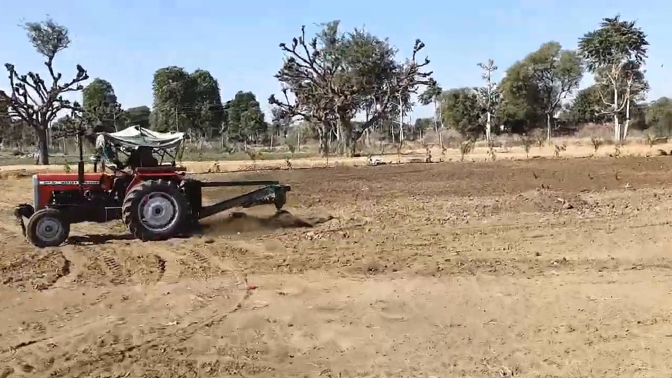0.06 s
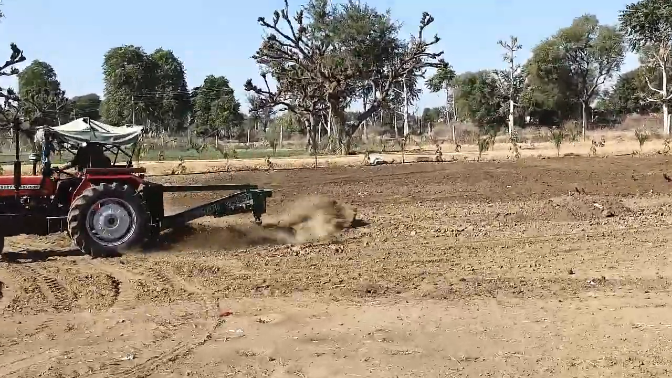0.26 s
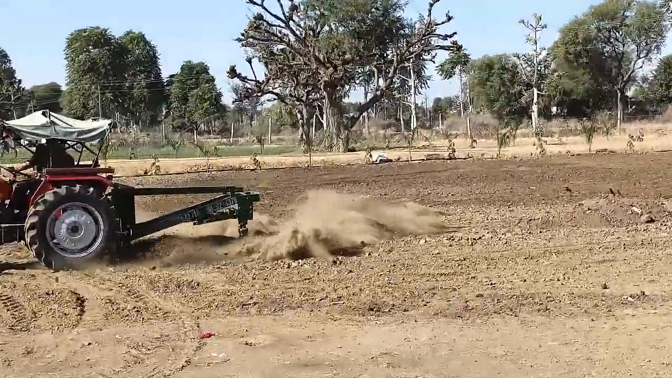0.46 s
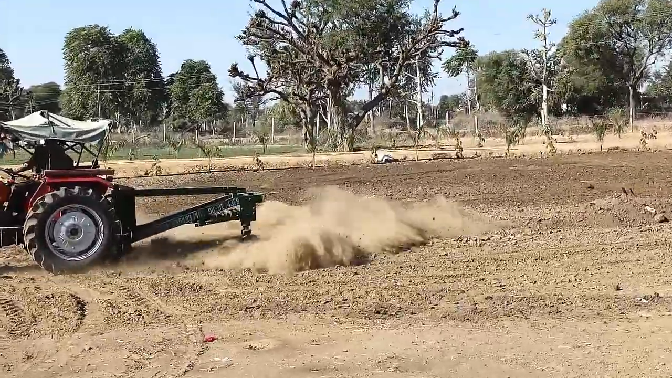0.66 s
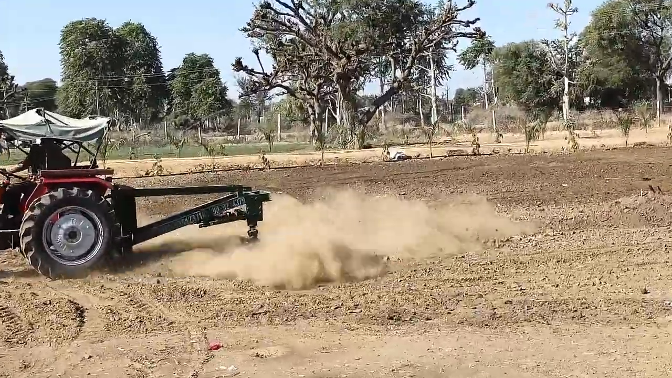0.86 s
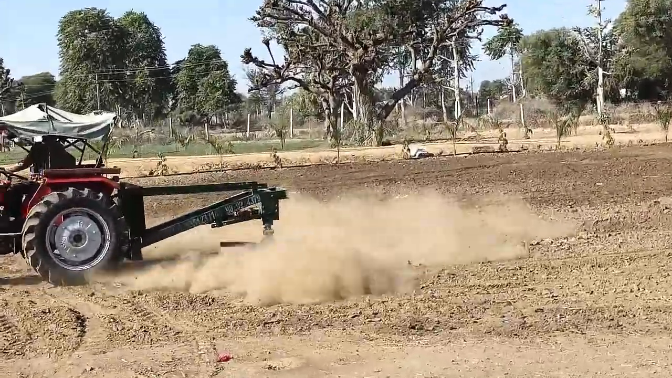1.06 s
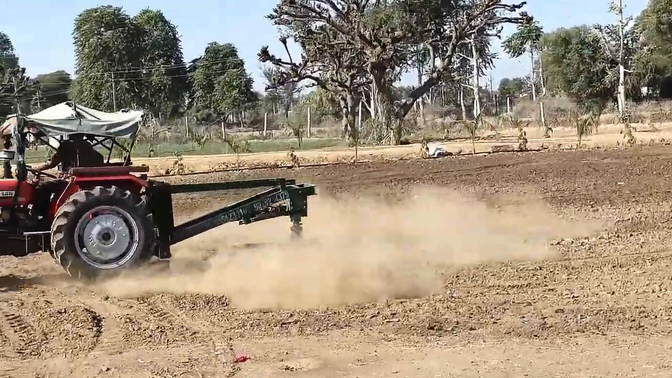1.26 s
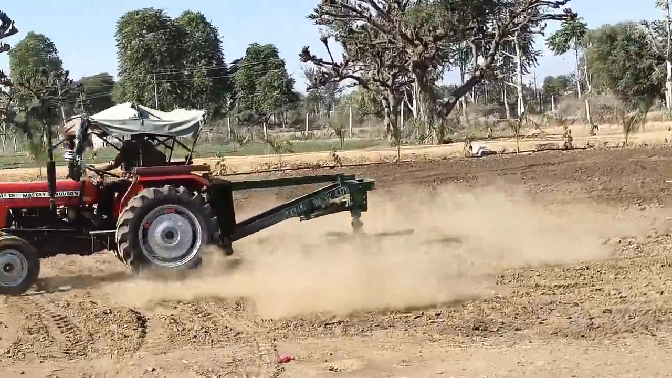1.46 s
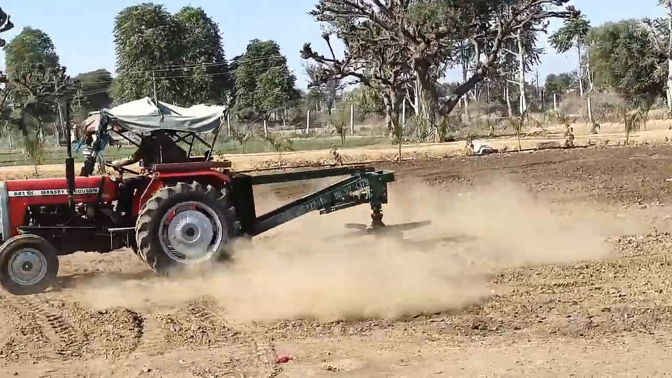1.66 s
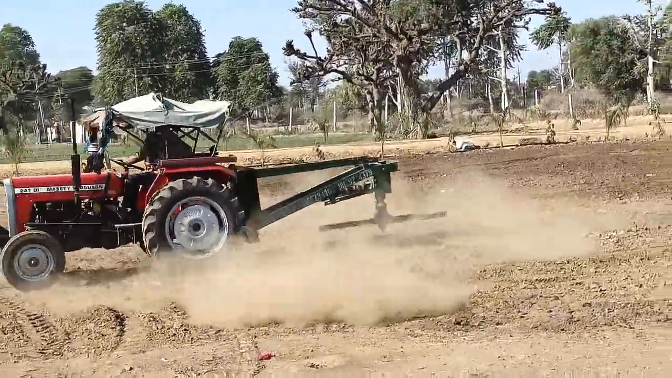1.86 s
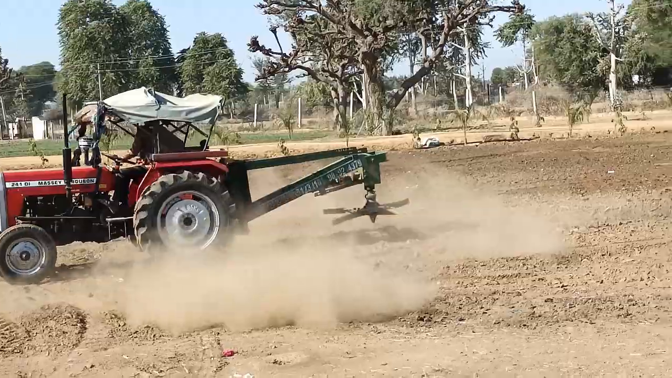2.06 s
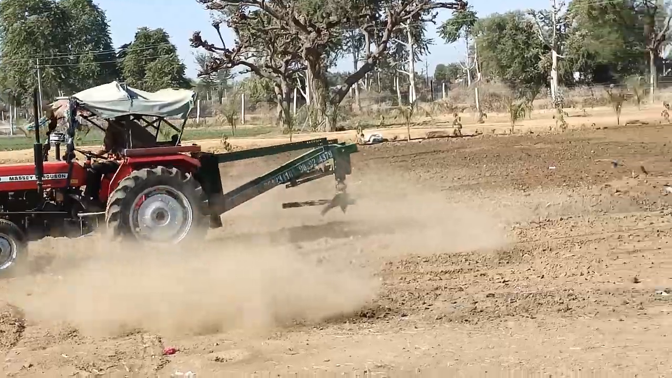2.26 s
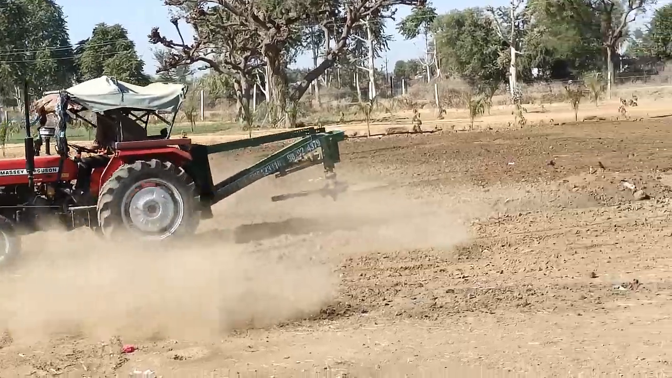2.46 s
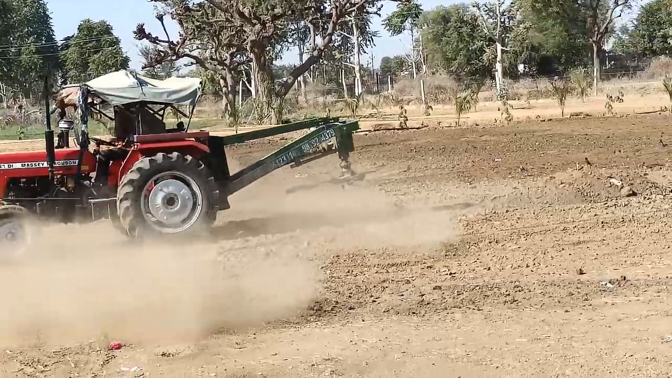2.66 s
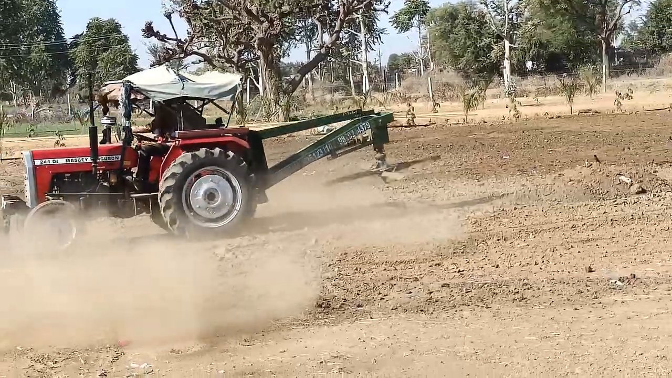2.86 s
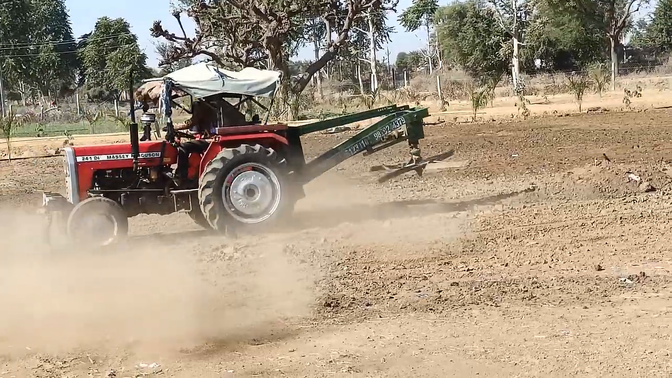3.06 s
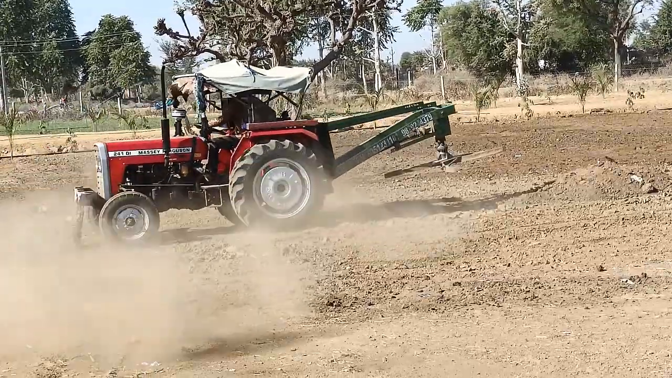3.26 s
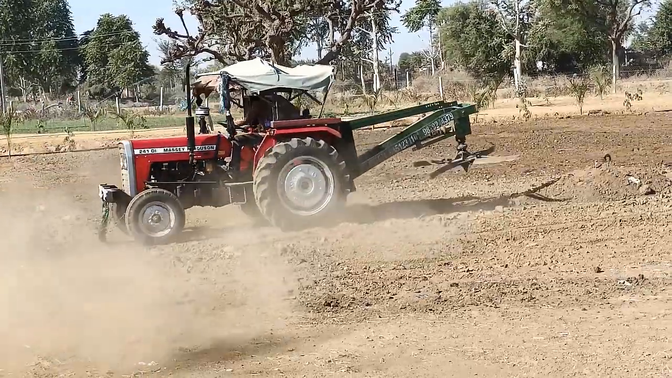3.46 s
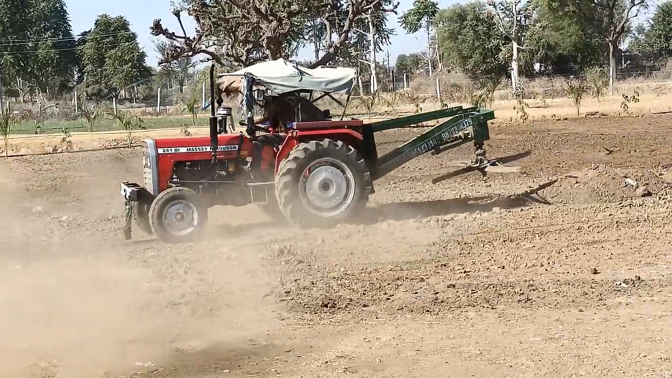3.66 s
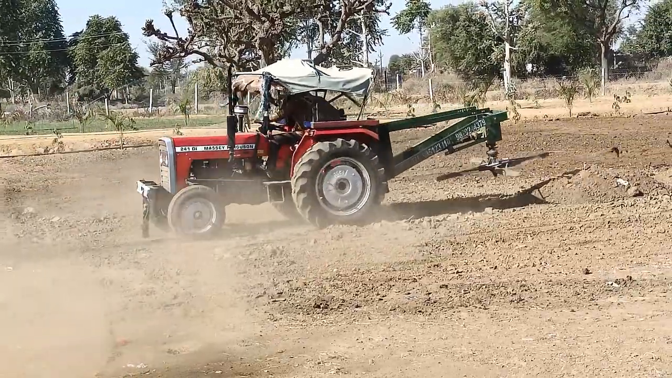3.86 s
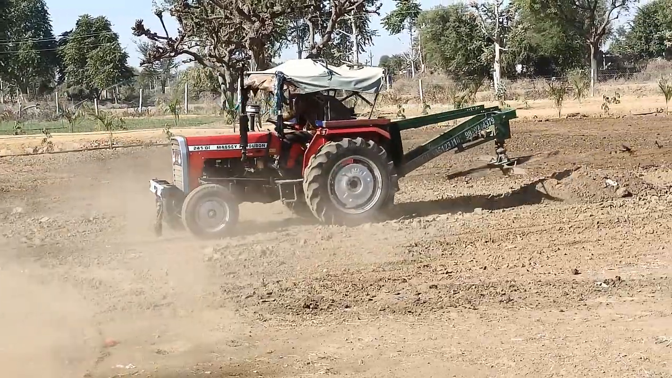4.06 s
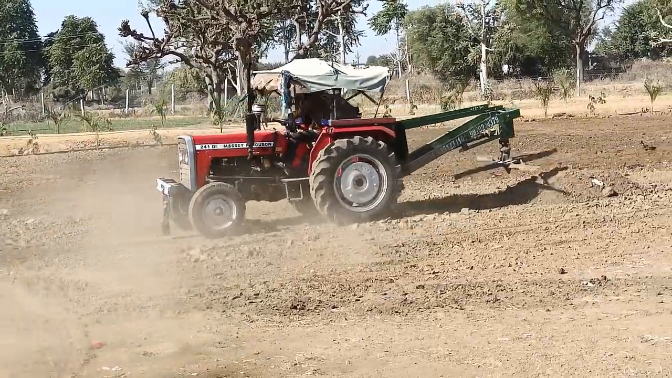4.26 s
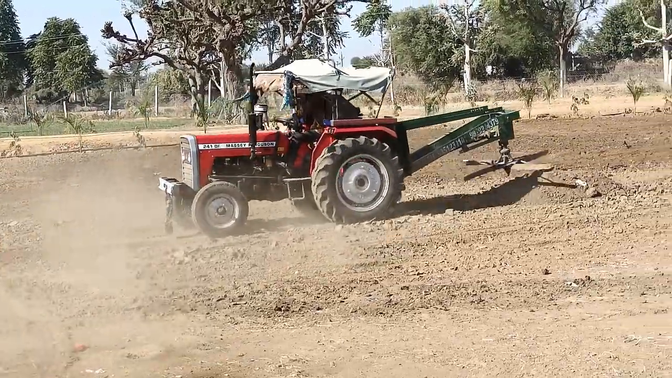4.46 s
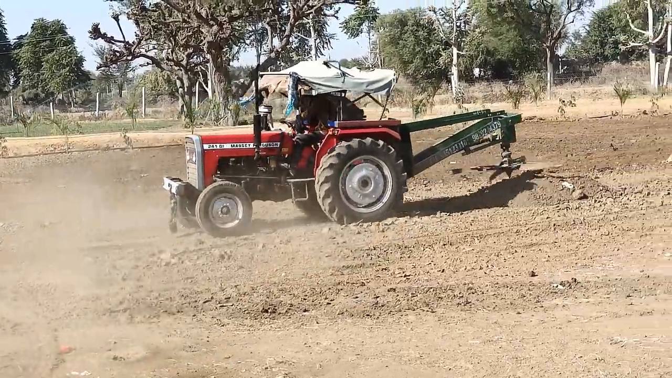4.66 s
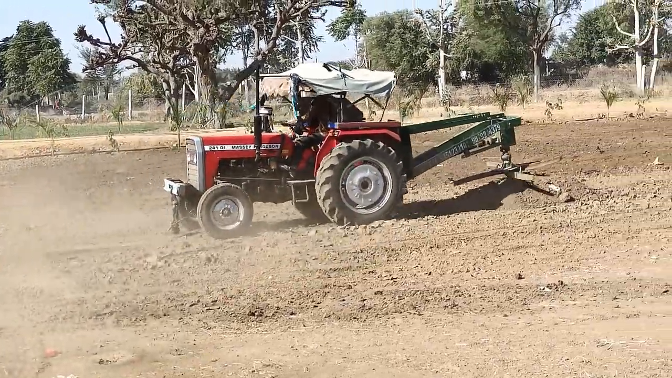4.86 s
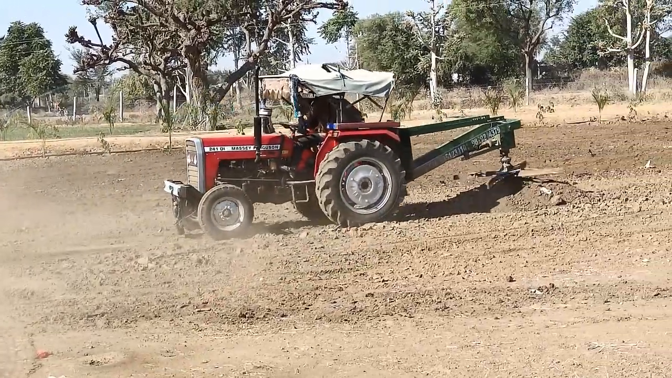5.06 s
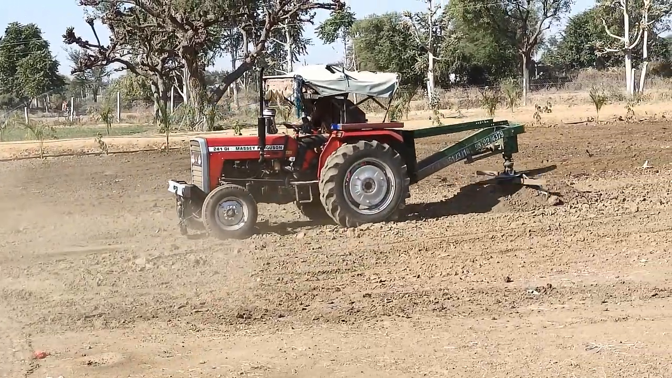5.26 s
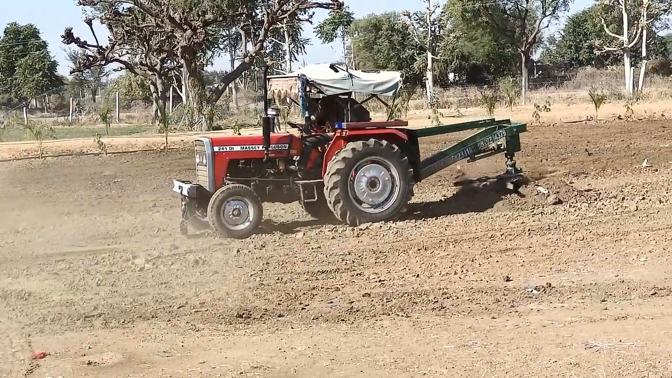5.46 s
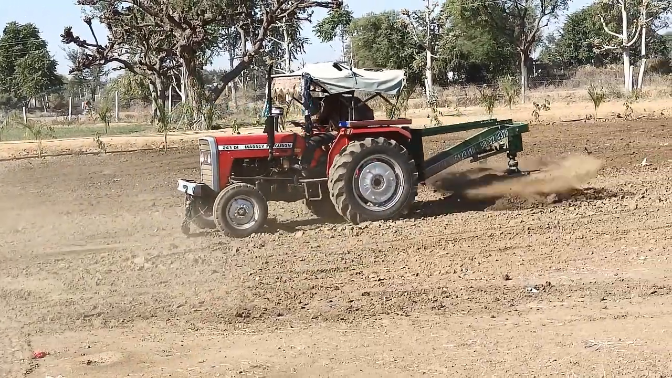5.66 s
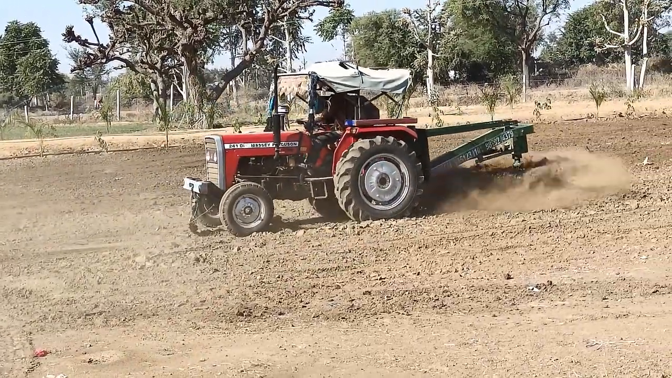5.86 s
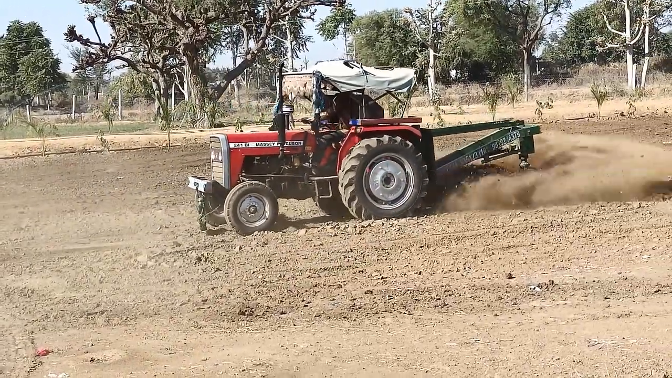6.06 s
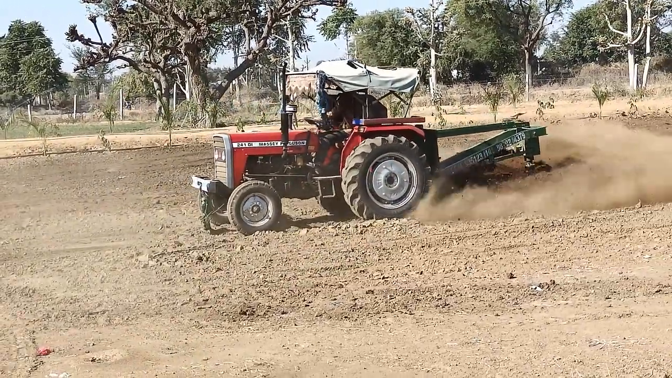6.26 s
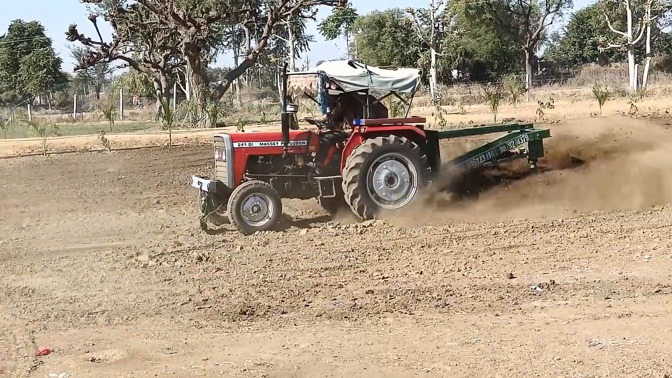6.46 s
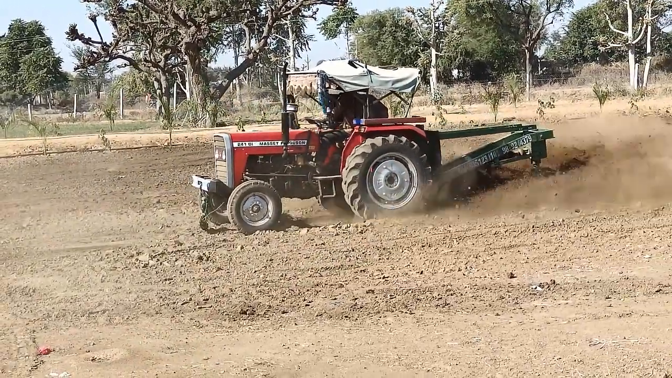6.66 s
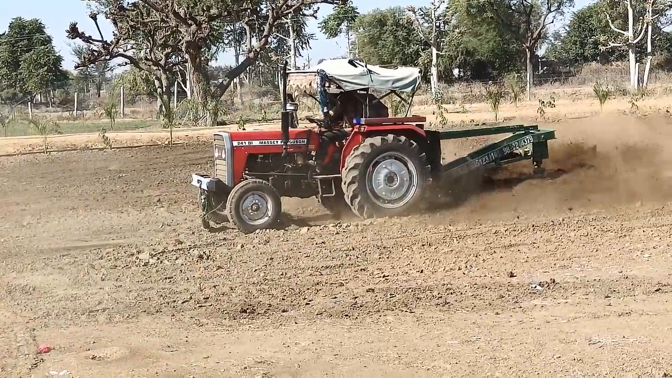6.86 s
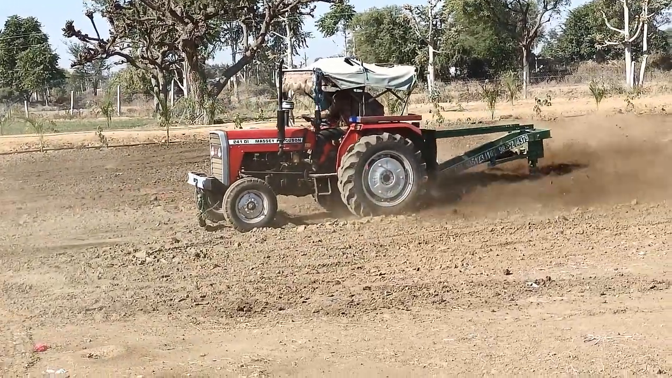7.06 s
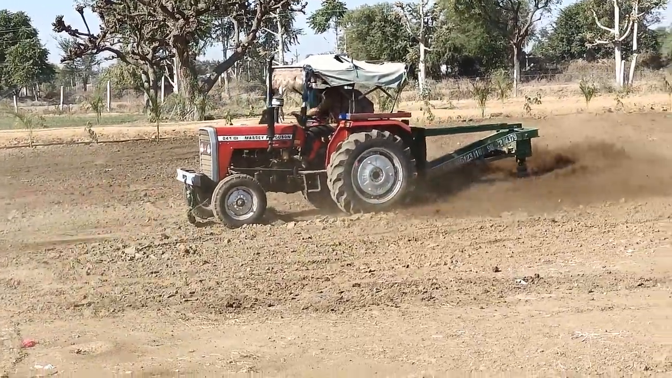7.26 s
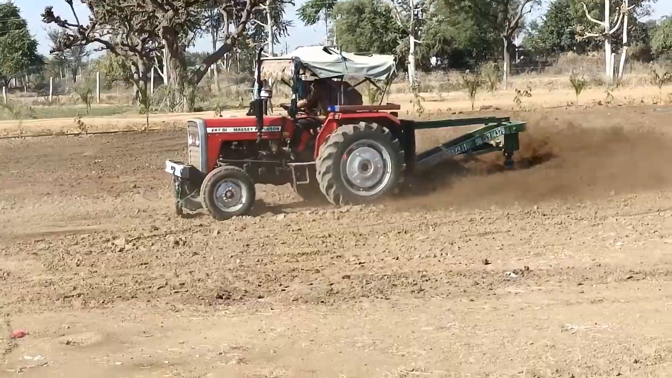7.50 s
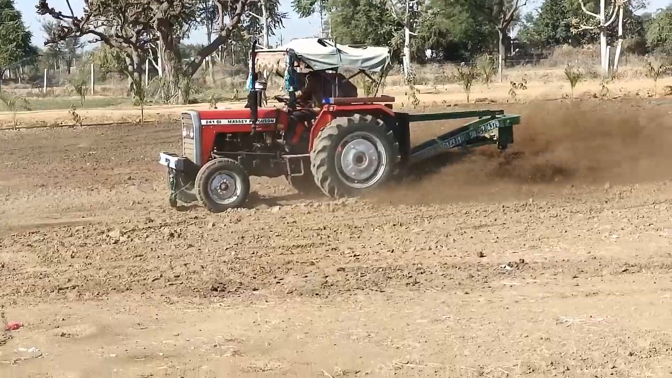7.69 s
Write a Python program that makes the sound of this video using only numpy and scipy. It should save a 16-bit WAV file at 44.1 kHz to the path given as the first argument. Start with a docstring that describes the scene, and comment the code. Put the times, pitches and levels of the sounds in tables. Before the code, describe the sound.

A tractor diesel thumps under load, revs up fast with early gritty scraping and metal clanks, coasts down to rattling clatter, then labours hard again.

```python
"""A tractor revs up, coasts down, then labours again; scraping is loud early, then fades.
Timed pressure swings make the exhaust thump; pulsed noise adds bark, growl, roar and hiss.
Knock noise rings the engine block and loose panels; grainy noise scrapes and sings in the steel blade.
Struck resonances clank, sines squeak, drone and whine, narrow noise hums, and low noise gusts as wind."""
import sys
import numpy as np
from scipy import signal
from scipy.fft import rfft, irfft, next_fast_len
from scipy.io import wavfile
from scipy.ndimage import uniform_filter1d

SR = 44100
rng = np.random.default_rng(int(sys.argv[2]) if len(sys.argv) > 2 else 0)


def int16_out(signal):
    """Quantize to a 16-bit WAV file."""
    q = np.round(np.clip(np.atleast_2d(signal).T, -1, 1) * 32767)
    wavfile.write(sys.argv[1], SR, q.astype(np.int16))


N = 340893
TIME = np.arange(N) / SR
CRUISE_PER_S = 25  # firing rate at which the level laws and swing pitch are quoted

# engine speed: t/s, firing rate/Hz
FIRING_RATE = [(0, 16.4), (.5, 16.5), (.64, 17.9), (.75, 20.9), (.88, 22), (1.02, 21.2), (1.14, 19.9),
               (1.3, 21.9), (1.49, 22.56), (1.88, 30.55), (2.32, 37.07), (2.6, 38.2), (3.74, 28.61),
               (5.3, 18.38), (5.64, 22.82), (5.78, 27.19), (6.21, 28.98), (6.46, 25.93), (6.8, 26.43),
               (7.24, 32.19), (7.73, 33.06)]
# spectrum of gas hiss: f/Hz, relative density/dB
JET_SPECTRUM = [(1500, -35), (3500, 0), (4300, 7), (5200, -11), (6400, 11), (7400, 21), (8100, 13.5),
                (8800, 3.5), (12000, 6.5), (16000, 6.5)]


def from_db(db):
    """Decibels to amplitude gain."""
    return 10 ** (np.asarray(db) / 20)


def rms_one(x):
    """Scale to rms 1 over all channels."""
    return x / np.sqrt(np.mean(x ** 2) + 1e-20)


def in_time(rows):
    """Columns of a time table, interpolated at every sample."""
    s, *columns = np.transpose(rows)
    return [np.interp(TIME, s, c) for c in columns]


def at_hz(points, hz):
    """Interpolate a spectrum on a log-frequency axis."""
    f, value = np.transpose(points)
    return np.interp(np.log(hz + 1), np.log(f), value)


def panned(pan_db):
    """Left and right gains of constant power for a left-right difference in dB."""
    gains = from_db(np.array([[.5], [-.5]]) * pan_db)
    return gains / np.sqrt(np.mean(gains ** 2, axis=0))


def drift(rate_hz):
    """Random curve through unit-spread knots at the given rate."""
    knots = rng.standard_normal(24000)
    return np.interp(TIME * rate_hz, np.arange(len(knots)), knots)


def pair(mid, side, alike):
    """Mix two unrelated signals to a left and right of given likeness."""
    alike = np.clip(alike, -1, 1)
    return np.sqrt(1 + alike) * mid + np.sqrt(1 - alike) * side * [[1], [-1]]


def coloured(spectrum, grain=1):
    """Shaped noise, smooth or grainy, with the likeness, lag and balance of two ports; rms 1."""
    # microphone ports: f/Hz, likeness/0-1, phase lag of the left/rad
    ports = [(60, 0.76, 0.77), (300, 1, 0.16), (463, 0, 0.46), (806, 1, 0.11), (1270, 0.25, 2.09),
             (1434, 0.94, 2.96), (1536, 0.15, 5.6), (1960, 0.95, 7.26), (2440, 0.34, 9.2),
             (3000, 0.57, 11.3), (3514, 0.68, 14.57), (4640, 0, 19.2), (7580, 0.28, 36.3), (16360, 0, 68)]
    # colour difference of the ports: f/Hz, left-right/dB
    balance = [(300, 1.5), (450, 2), (580, -15), (800, -2), (1100, 3.5), (1600, -10.5), (1950, 3.5),
               (2350, 32), (2950, -13), (3600, -3.5), (4400, -7), (5200, 0.5), (7400, -13.5), (8800, 1),
               (11000, 5.5), (16000, 3.5)]
    size = next_fast_len(N)
    hz = np.arange(size // 2 + 1) * SR / size
    port_hz, alike, lag_rad = np.transpose(ports)
    mid, side = rfft(rng.standard_normal((2, N)) * grain, size)
    stereo = pair(mid, side, np.interp(hz, port_hz, alike))
    turned = np.exp(np.array([[-.5j], [.5j]]) * np.interp(hz, port_hz, lag_rad))
    shaped = stereo * turned * panned(at_hz(balance, hz)) * from_db(at_hz(spectrum, hz))
    return rms_one(irfft(shaped, size)[:, :N])


def resonate(x, hz, width_hz):
    """Two-pole resonance with gain near 1 at its peak."""
    r = np.exp(-np.pi * width_hz / SR)
    zeros = np.array([1, 0, -1]) * (1 - r * r) / 2
    poles = [1, -2 * r * np.cos(2 * np.pi * hz / SR), r * r]
    return signal.lfilter(zeros, poles, x + 1e-18)


def rung(x, modes):
    """Parallel resonances of alternating sign, weighted by relative rms; total rms 1."""
    total = 0
    for k, (hz, width_hz, db) in enumerate(modes):
        total = total + (-1) ** k * from_db(db) * rms_one(resonate(x, hz, width_hz))
    return rms_one(total)


def burst(age_s, rise_s, decay_s):
    """Gaussian rise up to age 0, exponential decay after it."""
    return np.exp(-np.where(age_s < 0, (age_s / rise_s) ** 2, age_s / decay_s))


def bursts(times, gains, rise, decay):
    """Sum of one burst at each time; rise and decay in s."""
    out = np.zeros(N)
    for s, gain in zip(times, gains):
        near = slice(max(int((s - 3 * rise) * SR), 0), max(int((s + 8 * decay) * SR), 0))
        out[near] += gain * burst(TIME[near] - s, rise, decay)
    return out


def throb(times, rise, decay, uneven_db):
    """One burst per firing event, of random strength."""
    return bursts(times, from_db(uneven_db * rng.standard_normal(len(times))), rise, decay)


def levelled(x):
    """Hold the power near 1 over a few firings."""
    power = uniform_filter1d(uniform_filter1d(x ** 2, size=SR // 10), size=SR // 10)
    return x / np.sqrt(np.maximum(power, 1e-12))


def firing_times():
    """A cylinder fires each time the crank has turned through one more firing interval."""
    first_firing = .2  # share of an interval
    turns = np.cumsum(in_time(FIRING_RATE)[0]) / SR
    return np.interp(np.arange(first_firing, turns[-1]), turns, TIME)


def crank_times(fired, share, count=1):
    """Moments recurring count times per firing interval, starting at a share of the first."""
    return np.interp(np.arange(share, len(fired) - 1, 1 / count), np.arange(len(fired)), fired)


def nose_on():
    """0 while the tractor is side-on, 1 once its nose has swung toward the microphone."""
    turn_start_s, turn_end_s = 3.15, 3.7
    return np.clip((TIME - turn_start_s) / (turn_end_s - turn_start_s), 0, 1)


def part_db(law, load, speed):
    """Level of an exhaust part from load, firing rate and heading, with random waver."""
    full_db, idle_loss_db, speed_db, nose_on_db, waver_db = law
    steady_db = full_db - idle_loss_db * (1 - load) + speed_db * np.log2(speed / CRUISE_PER_S)
    return steady_db + nose_on_db * nose_on() + waver_db * drift(8)


def thump(fired, speed, cut_hz=40):
    """Each slug of gas is a dip, peak and dip of pressure; also returns the peak times."""
    swing_hz, speed_power = 87.5, 0.2  # the swing tightens with engine speed
    swing_cycles, delay_cycles = 0.68, 0.477
    hz = swing_hz * (np.interp(fired, TIME, speed) / CRUISE_PER_S) ** speed_power
    peaks, out = fired + delay_cycles / hz, np.zeros(N)
    for s, f, gain in zip(peaks, hz, from_db(2.2 * rng.standard_normal(len(fired)))):
        near = slice(max(int((s - 2 / f) * SR), 0), int((s + 2 / f) * SR))
        cycles = (TIME[near] - s) * f
        out[near] += gain * np.cos(2 * np.pi * cycles) * np.exp(-(cycles / swing_cycles) ** 2)
    # a fixed high-pass thins the lowest swing of the thump
    high_pass = signal.butter(2, cut_hz, "high", fs=SR, output="sos")
    return levelled(signal.sosfiltfilt(high_pass, out)), peaks


def drone(peaks):
    """Pipe harmonics phase-locked to the thumps, each wavering by itself."""
    # pipe harmonics: multiple of firing rate, relative level/dB
    harmonics = [(2, -8), (4, -0.5), (5, -4), (6, -8), (7, -10.5), (8, -10.5), (9, -47), (10, -14.5),
                 (11, -19)]
    phase = 2 * np.pi * np.cumsum(in_time(FIRING_RATE)[0]) / SR
    slip = np.interp(peaks, TIME, phase) - 2 * np.pi * np.arange(len(peaks))
    phase = phase - np.interp(TIME, peaks, slip)
    total = 0
    for k, db in harmonics:
        total = total + from_db(db + 3 * drift(9)) * np.cos(k * phase + .35 * drift(15))
    return rms_one(total)


def exhaust(fired, load, speed):
    """Gas pulses thump, growl, bark and hiss; load makes them stand out of the steady flow."""
    # part laws: full-load cruise level/dB before mix trims, loss at zero load/dB,
    # change per speed doubling/dB, gain nose-on/dB, waver/dB
    thump_law = (-29.5, 54, 5.5, -1.5, 2)
    roar_law = (-36, 21.5, 4.5, -1.5, -1.33)
    jet_law = (-49.5, 20.5, -8.5, 4, 1)
    # pipe: t/s, drone level/dB, growl level/dB before trim
    pipe_level = [(0, -85, -69), (.3, -67, -39), (1.05, -55, -55), (1.55, -37.5, -34), (2.1, -40.5, -33.5),
                  (2.35, -34.5, -31.5), (2.55, -38, -36), (2.85, -54, -32), (3.05, -63, -41),
                  (3.3, -68, -54.5), (5.5, -64.5, -60), (5.8, -42, -54), (6.15, -48, -44), (6.4, -51, -58),
                  (6.85, -54, -44), (7.1, -38, -38), (7.28, -43, -43), (7.42, -36.5, -36.5),
                  (7.73, -37.5, -37.5)]
    # noise spectra: f/Hz, relative density/dB
    rumble_spectrum = [(20, -29), (45, -10), (80, 1.5), (170, -1), (260, -24), (380, -57), (900, -89)]
    growl_spectrum = [(25, -37), (60, -3.5), (130, 6), (170, 11), (230, 2), (300, 3.5), (370, -0.5),
                      (430, -10.5), (490, -7), (900, -35)]
    bark_spectrum = [(50, -38), (150, -25), (300, -15), (490, -27), (640, 4.5), (780, 4), (1050, -12),
                     (1500, 0), (2500, -8), (3100, -14), (4300, -13), (6000, -17)]
    roar_spectrum = [(40, -19), (250, -8.5), (480, -30.5), (660, -6.5), (800, 1), (1000, 2), (1250, 1.5),
                     (1550, -6), (1950, -5.5), (2200, -10), (2550, -8.5), (2800, -15), (3080, -24),
                     (6000, -81)]
    # stack lip resonances: f/Hz, width/Hz, relative level/dB
    lip_modes = [(735, 43, -1), (820, 260, -0.5), (1150, 140, -10)]
    idle_punch, punch_power = .34, 6
    merge_per_s = 42  # hiss pulses have run together at this firing rate

    thump_db, roar_db, jet_db = (part_db(law, load, speed) for law in (thump_law, roar_law, jet_law))
    drone_db, growl_db = in_time(pipe_level)
    punch = idle_punch + (1 - idle_punch) * load ** punch_power
    swings, peaks = thump(fired, speed)
    low = from_db(thump_db) * (from_db(-2.5) * swings + from_db(-6.5) * coloured(rumble_spectrum))
    low = low + from_db(drone_db) * drone(peaks)

    # a steep pressure front rings the lip of the stack
    fronts = throb(fired + 0.0007, rise=0.00018, decay=0.00014, uneven_db=-3.0)
    lip = levelled(rung(fronts * (1 + .5 * drift(3000)), lip_modes))
    crack = throb(fired + 0.00091, rise=0.00184, decay=0.0055, uneven_db=2.8)
    growl = from_db(growl_db - 3.5) * coloured(growl_spectrum) * levelled(1 + 0.57 * crack)
    bark_noise = coloured(bark_spectrum) * levelled(0.18 + crack)
    bark = from_db(thump_db) * punch * (from_db(-16.5) * lip + from_db(-9.5) * bark_noise)
    roar = from_db(roar_db) * coloured(roar_spectrum) * levelled(1 + 0.98 * punch * crack)

    blowdown = throb(fired - .0005, rise=.0016, decay=.0035, uneven_db=2)
    blowdown = blowdown + .3 * throb(fired + .002, rise=.003, decay=.011, uneven_db=2)
    apart = np.clip((merge_per_s - speed) / 10, 0, 1)
    jet_flow = levelled(.055 + apart * punch ** 3 * blowdown)
    jet = from_db(jet_db) * coloured(JET_SPECTRUM) * jet_flow
    return low + growl + bark + roar + jet


def spits(whistle_hz=7450, whistle_width_hz=700, hiss_db=-13):
    """Hard firings cough and whistle briefly at the stack lip: short bursts of coloured noise."""
    # firings that stand out: t/s, whistle level/dB, cough level/dB before trim
    hard_firings = [(0.187, -33, -51), (0.255, -28, -41), (0.613, -25.5, -40), (0.669, -33.5, -35),
                    (0.721, -27.5, -38), (.769, -24.5, -36), (1.248, -39, -43), (1.291, -36.5, -39),
                    (1.336, -37, -39), (1.383, -31.5, -40), (1.43, -38, -34), (1.472, -29.5, -61),
                    (1.515, -27, -41), (1.599, -30, -33.5), (2.046, -58, -30.5), (2.163, -59, -30),
                    (2.193, -59, -36), (2.276, -50, -25.5), (2.303, -52, -27.5), (5.6, -52, -38),
                    (5.728, -57, -48), (6.523, -52, -28.5), (6.562, -44, -52), (6.636, -41, -36),
                    (6.673, -42, -34), (6.831, -55, -30.5), (6.902, -52, -34), (6.941, -55, -35),
                    (7.043, -42, -43), (7.141, -53, -31.5), (7.174, -44, -30), (7.484, -58, -36),
                    (7.644, -51, -34)]
    # cough spectrum: f/Hz, relative density/dB
    cough_spectrum = [(150, -48), (420, -8), (650, 3.5), (850, 12.5), (1050, -8), (1600, -18), (5000, -28)]
    s, whistle_db, cough_db = np.transpose(hard_firings)
    whistle = rms_one(resonate(rng.standard_normal((2, N)), whistle_hz, whistle_width_hz)) * panned(-25)
    hiss = from_db(hiss_db) * coloured(JET_SPECTRUM)
    spit = (whistle + hiss) * bursts(s, from_db(whistle_db), rise=.0009, decay=.0028)
    return spit + coloured(cough_spectrum) * bursts(s, from_db(cough_db + 3.5), rise=0.0005, decay=0.007)


def knocks(fired, knock_db):
    """Each combustion is a sharp, dry clack with a weaker rebound, of random strength."""
    # knocks that stand out: t/s, peak of envelope/dB
    hard_knocks = [(0.335, -37), (.788, -35), (.834, -34), (.876, -27.5), (0.967, -37), (1.063, -32),
                   (1.257, -31), (1.395, -31), (6.027, -32), (6.132, -28), (6.226, -27), (6.383, -35),
                   (6.613, -37), (6.649, -26), (6.728, -26), (6.844, -28), (7.181, -23.5), (7.247, -23),
                   (7.337, -28)]
    # dry clack spectrum: f/Hz, relative density/dB
    clack_spectrum = [(400, -47), (700, -15.5), (900, -2.5), (1150, 6), (1450, -2), (1700, 1), (1950, -0.5),
                      (2200, -10.5), (2500, -4.5), (3000, -28.5), (3600, -22), (4300, -32.5), (5200, -31.5),
                      (9000, -27)]
    knock_at, rebound_at = .32, .44  # shares of a firing interval
    first = throb(crank_times(fired, knock_at), rise=.0006, decay=.0038, uneven_db=2.5)
    rebound = throb(crank_times(fired, rebound_at), rise=.0005, decay=.003, uneven_db=3)
    s, db = np.transpose(hard_knocks)
    hard = bursts(s, from_db(db), rise=.0008, decay=.0045)
    usual = from_db(knock_db) * (first + 0.28 * rebound)
    return coloured(clack_spectrum) * np.hypot(usual, hard)


def rattle(level_db, shaking):
    """Loose panels chatter in fine grains and surge as the tractor jolts over ruts."""
    # jolts: t/s, rise/s, peak surge/dB
    jolts = [(2.822, .012, 3), (2.965, .02, 1.5), (3.2, 0.032, 7), (3.44, .02, 1.5), (3.77, .025, 12),
             (4.42, 0.018, 7), (4.59, .02, 18), (4.84, .03, 6), (5.008, .008, 23), (5.105, .01, 11),
             (5.256, 0.0054, 14)]
    # panel spectrum: f/Hz, relative density/dB
    rattle_spectrum = [(1500, -12.5), (2200, -9), (2600, 9), (2850, -3.5), (3200, 4.5), (3550, 10),
                       (3950, 3.5), (4400, 0), (5000, -10), (5500, -6), (7000, -10.5), (8900, -20.5),
                       (12000, -27)]
    jolt_fade_s = 0.027
    surge_db = sum(bursts([s], [db], rise, jolt_fade_s) for s, rise, db in jolts)
    looseness = from_db(2.4 * drift(260) + 1.3 * drift(14))
    return from_db(level_db + surge_db) * coloured(rattle_spectrum, grain=looseness) * shaking


def block(fired, load):
    """Knock under load, piston and valve whirr at idle shake block resonances and loose panels."""
    # mechanical noise: t/s, block level/dB, knock level/dB, panel level/dB
    clatter_level = [(0, -45.5, -29, -53), (.6, -48.5, -34.5, -61), (.85, -51.5, -29.5, -44.5),
                     (1.05, -49.5, -34, -73), (1.3, -57.5, -31.5, -55), (1.55, -47.5, -36, -49),
                     (1.9, -60.5, -48, -43.5), (2.45, -45, -34, -39), (3, -48.5, -42, -45.5),
                     (3.3, -51.5, -62, -48.5), (3.75, -49.5, -41, -55.5), (4.05, -51.5, -55, -57.5),
                     (4.75, -48, -50, -75), (5.4, -49, -40, -56), (5.6, -43.5, -22.5, -44),
                     (5.9, -47.5, -40, -45.5), (6.03, -41.5, -30, -40.5), (6.3, -43.5, -38, -43.5),
                     (6.62, -40.5, -27, -40.5), (6.92, -45, -37, -45), (7.25, -43.5, -37, -41.5),
                     (7.73, -46, -32.5, -44.5)]
    # block resonances: f/Hz, width of each of two passes/Hz, relative level/dB
    block_modes = [(847, 77, -0.34), (1060, 140, -17), (1307, 104, 0), (1427, 81, 0.5), (1646, 100, 0),
                   (1781, 100, 0), (1907, 135, 0), (2397, 89, -6.5), (2506, 70, -4), (3340, 120, -26),
                   (3694, 220, -10), (4000, 67, -33), (4410, 190, -18), (5420, 74, -28), (5780, 340, -23.5),
                   (6660, 150, -24), (7730, 140, -28), (7800, 200, -40), (9700, 490, -26.5)]
    knock_at = .32  # share of a firing interval
    flutter_depth_db, swell_depth_db, sway_s = 2, 1.1, .0009  # swell and sway as at the first mode

    block_db, knock_db, rattle_db = in_time(clatter_level)
    # a slow engine knocks stroke by stroke, a fast one blurs
    hardness = load ** 2 * np.minimum(28 / in_time(FIRING_RATE)[0], 1.1) ** 2
    knock = throb(crank_times(fired, knock_at) - .002, rise=.001, decay=.008, uneven_db=2.5)
    recoil = throb(fired, rise=.0015, decay=.005, uneven_db=2)
    pistons = throb(crank_times(fired, knock_at, count=2), rise=.002, decay=.006, uneven_db=2)
    valves = throb(crank_times(fired, 0, count=3), rise=.001, decay=.004, uneven_db=3)
    whirr = (1 - .6 * load) * (.9 * pistons + 1.1 * valves)
    blows = 1 + hardness * (2.6 * knock + 1.3 * recoil) + whirr
    shaking = levelled(blows * from_db(2 * drift(300)))
    drive = coloured([(100, 0), (10000, 0)]) * shaking

    rings, first_hz = 0, block_modes[0][0]
    for hz, width_hz, db in block_modes:
        # each resonance flutters quickly, swells slowly and sways in pitch
        flutter_db = flutter_depth_db * drift(18) + swell_depth_db * np.sqrt(hz / first_hz) * drift(6)
        swayed = TIME + sway_s * drift(12) * np.sqrt(first_hz / hz)
        steady = resonate(resonate(drive, hz, width_hz), hz, width_hz)
        ring = np.array([np.interp(swayed, TIME, side) for side in steady])
        rings = rings + rms_one(ring) * from_db(db + flutter_db)
    return from_db(block_db) * rings + knocks(fired, knock_db) + rattle(rattle_db, shaking)


def gear_whine():
    """A gear whines at top speed: a gliding sine with phase jitter and level waver."""
    # whine: t/s, f/Hz, level/dB before trim
    whine_track = [(2.15, 410, -90), (2.28, 422, -50), (2.5, 437, -40), (2.65, 435, -59.5),
                   (2.83, 427, -48), (3, 406, -55), (3.12, 398, -53), (3.3, 390, -95)]
    trim_db, waver_db, jitter_rad = -4, 4, .6
    whine_hz, whine_db = in_time(whine_track)
    phase = 2 * np.pi * np.cumsum(whine_hz) / SR + jitter_rad * drift(40)
    return from_db(trim_db + whine_db + waver_db * drift(11.0)) * rms_one(np.sin(phase))


def hollow_hums():
    """Hollow hums swell briefly: twice-resonated noise under Gaussian envelopes."""
    # hums: t/s, half length to 1/e/s, f/Hz, level/dB
    hum_events = [(1.072, 0.062, 229, -38.5), (1.61, 0.04, 272, -43), (2.763, .07, 258, -51),
                  (3.01, 0.083, 256, -39), (3.498, 0.07, 240, -44), (5.952, 0.066, 223, -37.5),
                  (6.237, 0.062, 320, -45), (6.688, 0.041, 287, -46.5), (7.066, 0.042, 286, -44.5),
                  (7.523, 0.23, 313.5, -45.5)]
    width_hz = 33  # of each pass
    out = 0
    for s, half_s, hz, db in hum_events:
        tone = levelled(resonate(resonate(rng.standard_normal(N), hz, width_hz), hz, width_hz))
        out = out + from_db(db) * tone * np.exp(-((TIME - s) / half_s) ** 2)
    return out


def scraper(fired):
    """The blade judders with the engine and sings as clods crumble along it."""
    # scraping is loud early, then fades: t/s, level without singing/dB
    scrape_level = [(0, -51), (.14, -34.5), (.6, -47.5), (1.6, -50.5), (2.4, -79), (4.5, -93)]
    # soil spectrum: f/Hz, relative density/dB
    soil_spectrum = [(1500, -4), (2200, 8.5), (2650, 11.5), (3100, 3.5), (3700, 6), (4250, -12), (4900, 13),
                     (5600, 5.5), (6400, 7), (7800, -5), (8800, -11), (15000, -24)]
    # steel blade modes: f/Hz, width/Hz, relative level/dB
    blade_modes = [(4873, 11, -10), (5066, 11, -13), (5969, 16, -18), (6239, 22, -17)]
    sing_db = -13  # common trim of the blade modes
    judder = 1 + 2 * throb(fired + .003, rise=.002, decay=.008, uneven_db=3)
    grit = coloured(soil_spectrum, grain=judder * from_db(3 * drift(500) + 2 * drift(45)))
    singing = sum(from_db(db) * rms_one(resonate(grit, hz, width_hz)) for hz, width_hz, db in blade_modes)
    return from_db(in_time(scrape_level)[0]) * (grit + from_db(sing_db) * singing)


def linkage_clanks():
    """The linkage clanks as the frame jolts: short noisy contacts ring its resonances."""
    # clanks: t/s, strength/dB, f of strongest ringing/Hz
    clank_events = [(0.0895, -32.5, 1290), (0.134, -31, 1590), (0.194, -26, 1730), (0.4546, -30.5, 1390),
                    (1.138, -28.5, 1840), (2.677, -38, 4000), (2.823, -40, 4300), (2.9562, -32, 3530),
                    (2.981, -31, 1100), (3.18, -33, 1400), (5.257, -34, 1650)]
    # linkage modes: f/Hz, relative level/dB, t60/s
    linkage_modes = [(805, -14, 0.04), (1110, 2, 0.048), (1218, -5, 0.16), (1684, -6.5, 0.052),
                     (1922, -3, 0.064), (2360, -1, 0.05), (2860, -9, 0.04), (3580, -5, 0.023),
                     (3940, -3.5, 0.057), (4470, -4.5, 0.13), (5240, -12, 0.095)]
    focus_db_per_octave = 17.5
    s, db, centre_hz = np.transpose(clank_events)
    out = 0
    for hz, mode_db, t60_s in linkage_modes:
        away_db = focus_db_per_octave * np.abs(np.log2(hz / centre_hz))
        hit_db = db + mode_db - away_db + rng.normal(0, 1.5, len(s))
        contact = bursts(s, from_db(hit_db), rise=.0004, decay=.006)
        width_hz = np.log(1000) / (np.pi * t60_s)
        ring = resonate(contact * rng.standard_normal((2, N)), hz, width_hz)
        out = out + ring * np.sqrt(SR / width_hz)
    return out


def squeak():
    """A linkage pin slips: two nearly pure partials swell, break off and ring faintly."""
    # partials: t/s, f/Hz, level before ring is added/dB, rise/s
    partials = [(1.111, 2450, -31.5, .005), (1.112, 1222, -28.5, 0.0022)]
    decay_s, ring_db, ring_s = .004, -11, .03
    out = 0
    for s, hz, db, rise in partials:
        level = bursts([s], [1], rise, decay_s) + bursts([s], [from_db(ring_db)], rise, ring_s)
        tone = np.sin(2 * np.pi * hz * TIME + 0.46 * drift(140))
        out = out + from_db(db) * level * tone * panned(3)
    return out


def wind():
    """Low-frequency gusts buffet the two microphone ports unequally."""
    # gusts: t/s, rise/s, peak of envelope/dB, left-right gain/dB
    gusts = [(.125, 0.037, -47, 20), (.25, 0.028, -33, -1), (.38, 0.028, -37, 13),
             (0.578, 0.0062, -17.5, -21), (.67, 0.08, -31, 26), (.799, 0.023, -24, -36),
             (.92, 0.086, -35.5, 0), (1.19, 0.13, -32.5, -13), (3.45, 0.096, -39, 28),
             (3.69, 0.029, -42.5, 13), (3.84, 0.073, -42, 2), (4.27, 0.11, -48.5, 18.5),
             (4.448, 0.013, -34, 26), (4.568, 0.068, -49.5, 26), (4.666, 0.017, -36.5, 28),
             (4.74, 0.03, -41.5, 20), (4.97, 0.029, -44, 22)]
    # wind spectrum: f/Hz, relative density/dB
    wind_spectrum = [(20, -80), (50, -8.5), (85, 1), (140, 3), (220, -7.5), (320, -18), (480, -35),
                     (900, -50.5)]
    fade_s, fade_per_rise = 0.028, 0.79  # a gust that builds slowly also dies slowly
    force = 0
    for s, rise, db, pan_db in gusts:
        swell = bursts([s], [1], rise, fade_s + fade_per_rise * rise)
        force = force + from_db(db) * panned(pan_db) * swell
    return force * coloured(wind_spectrum)


def scene():
    """Tractor, scraper and wind in the open field."""
    # engine pull: t/s, load/0-1
    load_curve = [(0, 0.56), (.24, 0.94), (.5, 0.76), (.62, 0.73), (.84, 0.86), (.98, 0.73), (1.51, 0.98),
                  (1.92, 0.95), (2.42, 0.88), (2.54, 0.84), (3, 0.78), (3.27, 0.6), (4.2, 0), (5.44, 0.08),
                  (5.57, 0.93), (6.13, 0.94), (6.35, 0.8), (6.53, 0.98), (7.73, 0.93)]
    fired, speed = firing_times(), in_time(FIRING_RATE)[0]
    load = np.clip(in_time(load_curve)[0], 0, 1)
    engine = exhaust(fired, load, speed) + spits() + block(fired, load) + gear_whine() + hollow_hums()
    implement = scraper(fired) + linkage_clanks() + squeak()
    return engine + implement + wind()


def record(dry):
    """A steep elliptic low-pass removes the top."""
    cutoff_hz = 16000
    return signal.sosfilt(signal.ellip(12, .1, 80, cutoff_hz, fs=SR, output="sos"), dry)


dry = scene()
out = record(dry)
int16_out(out)
```